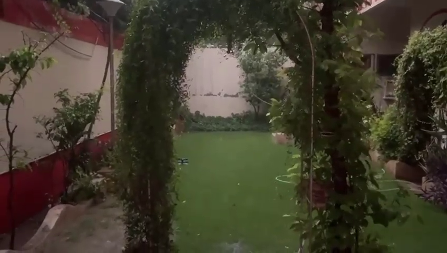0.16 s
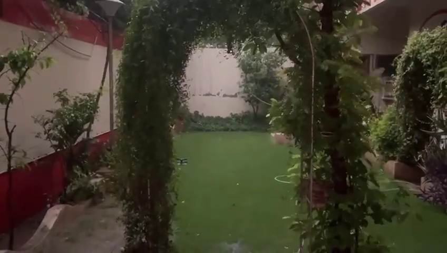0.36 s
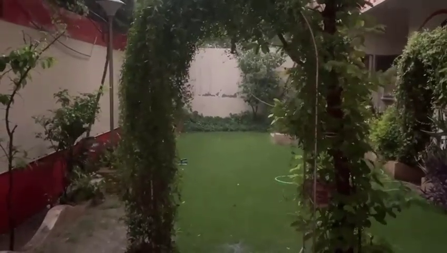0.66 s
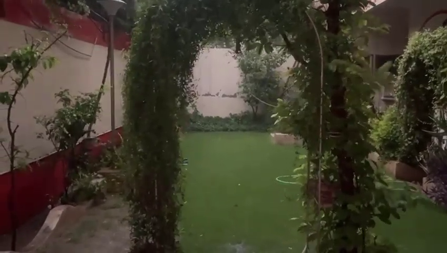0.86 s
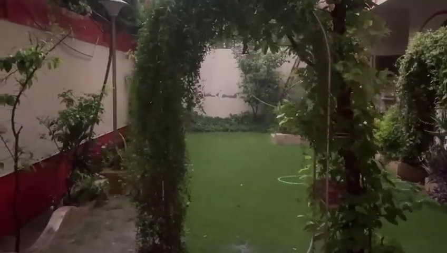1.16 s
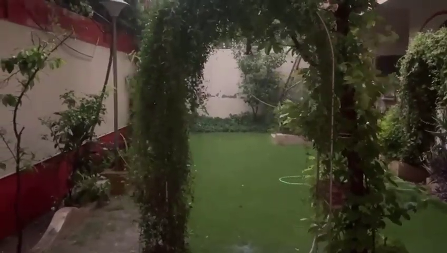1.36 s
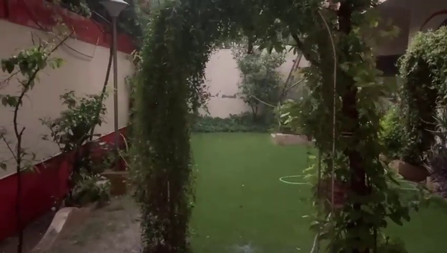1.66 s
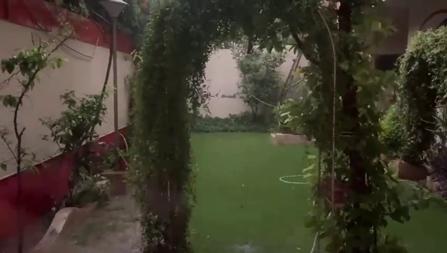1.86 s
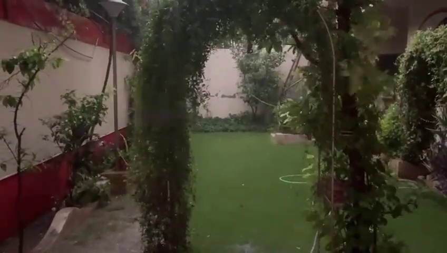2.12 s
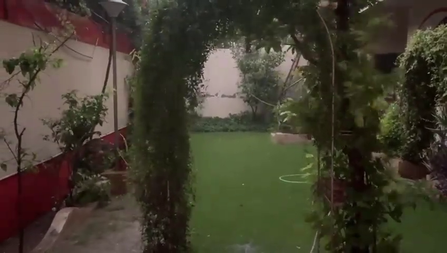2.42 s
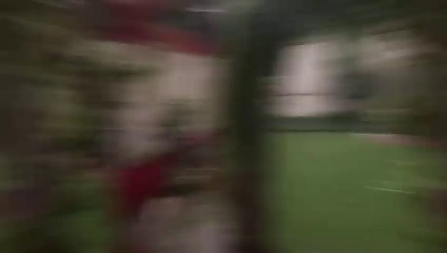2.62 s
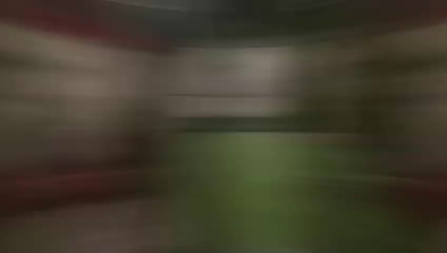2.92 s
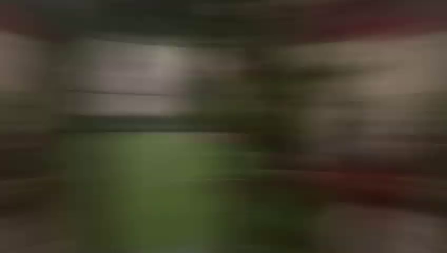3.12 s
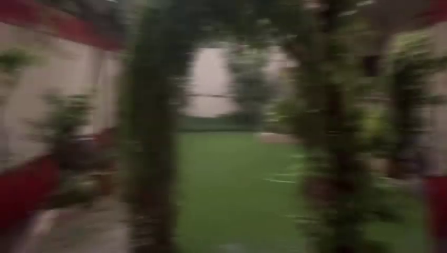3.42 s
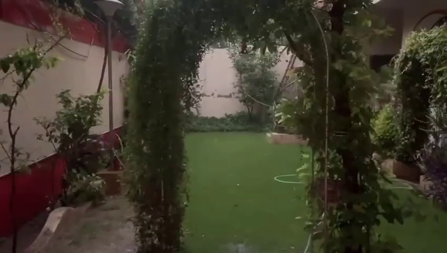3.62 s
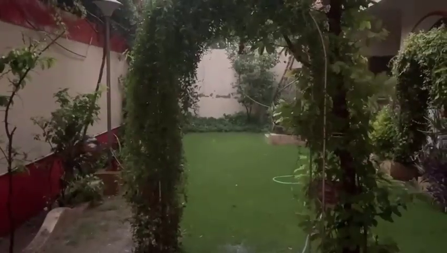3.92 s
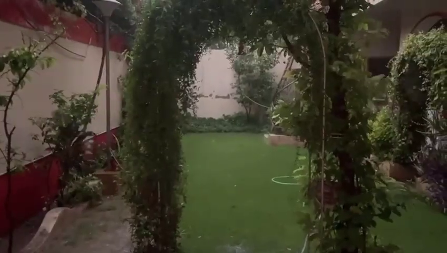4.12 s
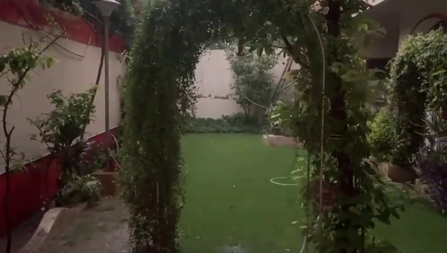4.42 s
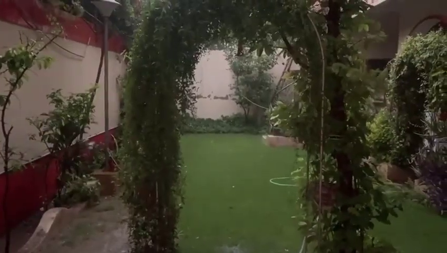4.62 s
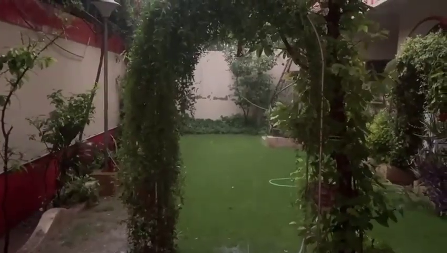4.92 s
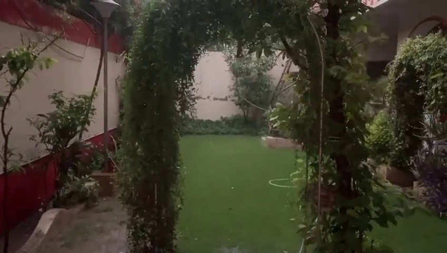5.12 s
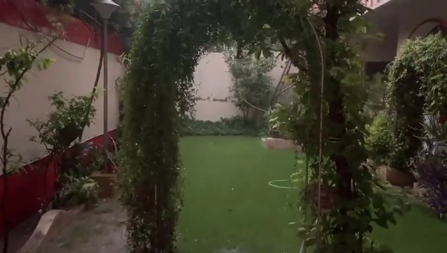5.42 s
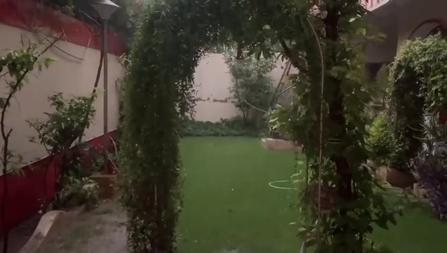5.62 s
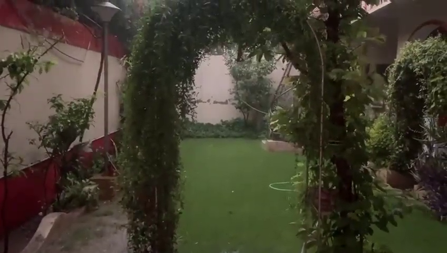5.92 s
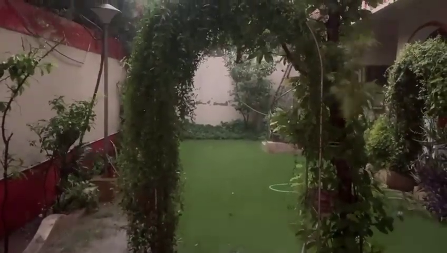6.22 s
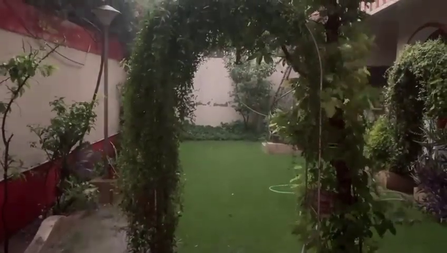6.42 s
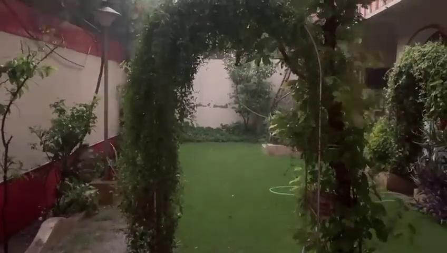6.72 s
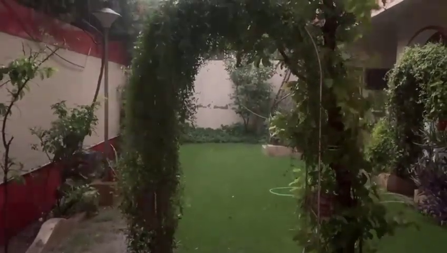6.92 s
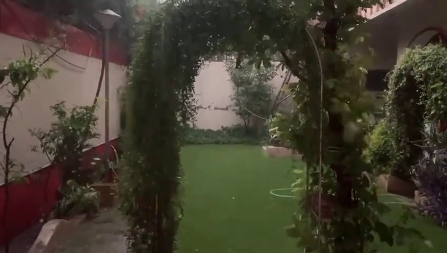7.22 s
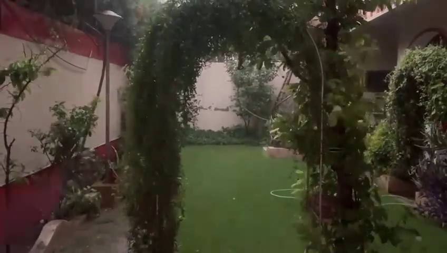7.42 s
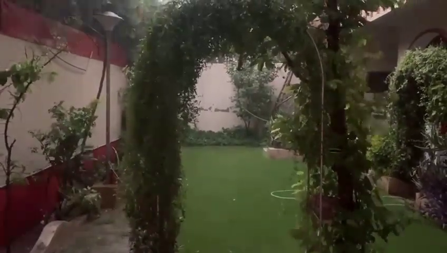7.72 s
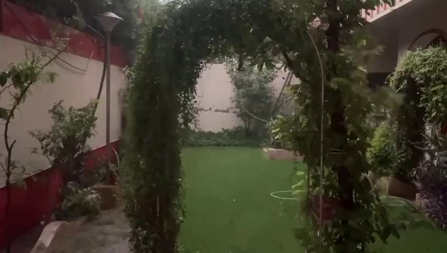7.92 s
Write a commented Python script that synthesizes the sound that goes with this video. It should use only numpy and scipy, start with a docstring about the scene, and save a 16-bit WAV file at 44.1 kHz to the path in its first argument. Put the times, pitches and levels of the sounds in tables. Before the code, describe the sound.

Dense rain patters on foliage, close drips snap and splat on stone, bass rumbles underneath, and dull handling bumps thud late on.

```python
"""Heavy garden rain

Rain on a walled garden, heard from under the eaves: a patchy noise wash thickens unevenly overall.
Close by, resonated impulses patter and tap on leaves, gliding sines plink in puddles,
and fat drips crack, splat and spray on wet paving. Swelling bass noise rumbles underneath, with air
on the microphones; sinking sine thumps are bumps of the hand-held recorder."""
import sys
import numpy as np
from scipy import signal
from scipy.fft import rfft, irfft, next_fast_len
from scipy.io import wavfile
from scipy.ndimage import uniform_filter1d

SR = 44100
rng = np.random.default_rng(int(sys.argv[2]) if len(sys.argv) > 2 else 0)


def persist_wave(psi):
    """Save psi, clipped to +-1, as 16-bit WAV."""
    counts = np.round(np.clip(psi, -1, 1) * 32767).astype(np.int16)
    wavfile.write(sys.argv[1], SR, np.atleast_2d(counts).T)


N = 355446

# Rain intensity over the garden. Each row: time in seconds, level in dB before a layer's own gain.
RAIN_LEVEL = [(0.0, -38), (2.58, -36.5), (2.9, -36.5), (3.3, -34.5), (4.08, -38), (6.13, -35), (6.28, -33),
              (8.06, -31.5)]
# Fat drips on paving. Each row: start in seconds, crack level in dB, pitch in Hz, splat level in dB,
# spray level in dB before spray_trim_db.
PAVING_DRIPS = [(0.076, -15, 3330, -21.5, -25), (0.9574, -9.5, 4900, -39, -28),
                (1.1387, -10, 2990, -27, -40), (1.2458, 6, 5670, -27, -41), (1.403, -13, 4900, -25, -27.5),
                (1.4324, -8, 4840, -26, -32.5), (1.4733, -10, 2620, -22, -25.5),
                (1.5835, -9.5, 2800, -19, -28), (1.6, -5, 5800, -25.5, -22), (1.6651, -2, 5200, -19.5, -28),
                (1.735, -14, 5400, -25.5, -39), (1.877, -19, 4660, -24, -34.5),
                (1.9249, -4, 4440, -30, -22), (1.969, -7.5, 5300, -38, -33), (2.1128, -3.5, 5540, -29, -35),
                (2.3365, -27, 2430, -30, -38), (2.3771, -6, 5130, -25, -26), (2.3966, -9.5, 4200, -26, -36),
                (3.115, -13, 3600, -29, -24.5), (3.4909, -16, 2880, -30, -31.5),
                (3.8354, -6.5, 4200, -26, -24.5), (4.35, -15, 1810, -28, -32),
                (4.3587, -15, 2350, -22, -32.5), (4.455, -14.5, 3230, -25, -26.5),
                (4.5945, -13.5, 4500, -26, -32), (4.674, -13, 3160, -16.5, -31),
                (4.6847, -15, 3930, -20, -27), (4.8009, -16, 3160, -24.5, -28.5),
                (4.8607, -12, 4670, -23, -32), (5.056, -5, 6400, -24, -44), (5.176, -11.5, 4800, -31, -42),
                (5.3647, -9, 3400, -25, -28), (5.9084, -14, 3960, -27, -26.5),
                (6.25, -10, 3900, -27, -27.5), (6.286, -11, 3280, -29, -25),
                (6.9732, -6, 5040, -30.5, -24.5), (7.2446, -14.5, 2620, -27, -26),
                (7.3716, -12, 3240, -28, -26.5), (7.6855, -5, 5170, -16.5, -20),
                (7.785, -12, 4700, -27, -24), (7.9755, -18, 4300, -26.5, -26)]
# Noise and drop spectra. Each row: frequency in Hz, relative level in dB.
WASH_SPECTRUM = [(80, -17), (200, 0.5), (400, 3.5), (700, 0.5), (1200, -0.77), (1700, -4), (2400, -5),
                 (5000, -6), (7000, -10), (9000, -13), (11400, -25)]
PATTER_SPECTRUM = [(300, -22), (1500, -10), (2100, -3), (2900, .8), (4200, 0), (5500, -.3), (7000, 0),
                   (8200, -3), (9500, -8), (11400, -13.5)]
RUMBLE_SPECTRUM = [(30, -24.5), (70, -32.5), (88, -3.5), (106, 1.5), (132, -4.5), (160, -4), (220, -9.5),
                   (330, -11.5), (500, -22), (800, -31), (1200, -56), (2500, -73.5)]
AIR_SPECTRUM = [(12, -33), (28, -12.5), (45, 4.5), (62, 9.5), (80, -0.5), (105, -16), (200, -15),
                (600, -62)]
# Likeness of left and right. Each row: frequency in Hz, likeness from 0 to 1.
STEREO_LIKENESS = [(60, .975), (300, .95), (480, .84), (700, .54), (1600, .36), (2300, .8), (3400, .52),
                   (4800, .93), (5600, .7), (6350, .35), (6650, 1), (8900, 1), (9050, .55), (9300, .4),
                   (9800, .995)]
# Phase between left and right: opposite from 6.6 to 8.9 kHz, cancelling in mono.
# Each row: frequency in Hz, lead of left over right in radians.
STEREO_LEAD = [(100, 0), (600, -.2), (1100, .4), (1800, -.3), (3200, .7), (4200, .1), (5600, 0),
               (6250, -.7), (6600, -np.pi), (8900, -np.pi), (9000, -4.2), (9400, -5.6), (9700, -2 * np.pi)]
# Balance of left and right. Each row: frequency in Hz, left minus right in dB.
STEREO_TILT = [(350, 0), (700, -1), (1500, -2), (2200, 1.5), (3400, 2.4), (4800, .8), (6000, 1.8),
               (6650, 0)]
# Recorder knocks. Each row: start in seconds, thump level in dB before the low-pass,
# settled pitch in Hz, t60 in seconds.
KNOCKS = [(2.6372, -9, 85, 0.23), (6.963, -12, 76, 0.18), (7.046, -18.5, 170, .06),
          (7.057, -12, 129, 0.075), (7.069, -8, 101, 0.072), (7.1135, -15, 69.6, 0.11),
          (7.133, -11, 90, 0.11), (7.1616, -9.5, 57.4, 0.092), (7.241, -16.5, 125, .07),
          (7.264, -11.5, 63.3, .1), (7.607, -15, 87, .22)]
# Rumble swells. Each row: crest in seconds, length (rise plus fall width) in seconds, level in dB.
RUMBLE_SWELLS = [(0.27, 0.092, -25.5), (0.434, 0.14, -24), (0.638, 0.31, -25), (2.307, 0.6, -30.5),
                 (3.41, 0.24, -25), (4.36, 0.15, -25), (4.494, 0.11, -24), (4.757, 0.19, -29.5),
                 (5.99, 0.38, -27), (6.37, 0.26, -25), (6.94, .07, -25.5), (7.154, 0.17, -20.5)]
# Stronger puffs of air. Each row: crest in seconds, length (rise plus fall width) in seconds, level in dB.
AIR_PUFFS = [(2.21, 0.57, -32.5), (3.055, 0.17, -26), (4.722, 0.24, -31), (7.162, 0.24, -27)]

PATTER_DB, PATTER_DB_PER_RAIN_DB, MIST_T60_S = -30.5, 0.071, .11
CRACK_Q, SNAP_DB = 1.8, -11  # snap relative to crack
TOCK_HZ, TOCK_DB, TOCK_DB_PER_OCTAVE, TOCK_T60_S = 2800, -8.5, -18, .03  # falls only above TOCK_HZ
BEAD_COUNT, BEAD_FIRST_S, BEAD_LAST_S, BEAD_DB = 6, .002, .02, -16  # relative to crack
SPLAT_T60_S, SPLAT_Q = .055, 2.6
SPRAY_T60_S, SPRAY_RISE_S = 0.69, 0.0031
BUBBLES_PER_S, BUBBLES_DB = 110, -42
BUBBLE_T60_AT_3KHZ_S, BUBBLE_CLIMB_PER_S = .022, 4  # climb as a share of the starting pitch
RAP_HZ, RAP_T60_S, RAP_DB = 235, .03, -13.5  # relative to thump
HEAVE_HZ, HEAVE_T60_S, HEAVE_DB = 44, .11, -8.5  # relative to thump
ROLL_REST_DB, RISE_SHARE = -28.5, 0.57  # share of a swell's length spent rising
AIR_REST_DB, AIR_DB_PER_ROLL_DB = -34.5, 0.75
RECORDER_EDGE_HZ = 11750


def wash(wash_db=6.0, patchy_db=2.0):
    """Countless far drops merge into a hiss, livelier now at one pitch, now at another."""
    grid = signal.stft(rng.standard_normal((2, N)), nperseg=512)[2]
    chance = rng.standard_normal(grid.shape[1:])
    patches = evened(signal.oaconvolve(chance, np.ones((3, 5)), "same"))
    hiss = signal.istft(grid * gain_of(patchy_db * patches), nperseg=512)[1][:, :N]
    return gain_of(wash_db) * level(RAIN_LEVEL) * coloured(hiss, WASH_SPECTRUM)


def patter(drops_per_s=3000, spread_db=3.5, biggest=4.54, spray_share=0.74, spot_q=3.9, evenness=0.33):
    """Near drops of very uneven size: each ticks at the pitch of its spot and throws a fine spray."""
    spots_hz = np.geomspace(2000, 9500, 10)
    size = drop_sizes(drops_per_s, spread_db, biggest)
    spot = rng.integers(0, len(spots_hz), N)
    sides = around(rng.random(N))  # drops land all around
    power_fade = gain_of(-60 / (MIST_T60_S * SR)) ** 2
    drops = np.zeros((2, N))
    for k, hz in enumerate(spots_hz):
        hits = size * (spot == k)
        # big drops throw most of the spray
        mist = np.sqrt(signal.lfilter([1], [1, -power_fade], hits ** 4))
        spray = (evened(mist) + evenness) * rng.standard_normal((2, N))
        ticks = np.sqrt(1 - spray_share) * evened(hits * sides)
        drops += ring(ticks + np.sqrt(spray_share) * evened(spray), hz, spot_q)
    follow = evened(level(RAIN_LEVEL)) ** PATTER_DB_PER_RAIN_DB
    return gain_of(PATTER_DB) * follow * coloured(drops, PATTER_SPECTRUM)


def drips(spray_trim_db=-1.5, droplet_db=2.0, spray_q=0.76, low_share=0.53, fizz_db=-6.0):
    """A fat drip cracks on wet stone, scatters beads, bursts in a wet splat and throws a lasting spray."""
    out, t = np.zeros((2, N)), np.arange(SR // 2) / SR
    blow = signal.lfilter(*signal.butter(4, 10000, fs=SR), signal.unit_impulse(len(t)))
    snap = signal.lfilter(*signal.butter(1, 900, "highpass", fs=SR), blow)  # toneless water on stone
    ahead = np.array([[1], [.3]])  # direct sound leans on the first signal of the pair
    for start_s, crack_db, hz, splat_db, spray_db in PAVING_DRIPS:
        band = signal.butter(2, [low_share * hz, 8000], "bandpass", fs=SR, output="sos")

        crack = peaked(ring(blow, hz, CRACK_Q)) + gain_of(SNAP_DB) * snap / snap.max()
        octaves_up = max(np.log2(hz / TOCK_HZ), 0)
        tock_db = TOCK_DB + TOCK_DB_PER_OCTAVE * octaves_up
        tock = decay(t, TOCK_T60_S, tock_db) * np.sin(2 * np.pi * hz * t)
        add(out, start_s, gain_of(crack_db) * (peaked(crack) + tock) * ahead)

        for late, turn, small in rng.random((BEAD_COUNT, 3)):
            bead = gain_of(crack_db + BEAD_DB) * peaked(ring(blow, hz * 2 ** (small - .5), CRACK_Q))
            delay_s = BEAD_FIRST_S + (BEAD_LAST_S - BEAD_FIRST_S) * late
            add(out, start_s + delay_s, np.outer(around(turn), bead))

        droplet_size = gain_of(droplet_db * np.minimum(rng.exponential(1, len(t)), 5))
        droplets = rng.standard_normal((4, len(t))) * droplet_size
        fizz = gain_of(fizz_db) * evened(signal.sosfilt(band, droplets[:2]))
        burst = evened(ring(ring(droplets[:2], hz, SPLAT_Q), hz, SPLAT_Q))
        add(out, start_s, evened(burst + fizz) * decay(t, SPLAT_T60_S, splat_db))

        spray = evened(signal.sosfilt(band, ring(droplets[2:], hz, spray_q)))
        rise = 1 - np.exp(-t / SPRAY_RISE_S)
        add(out, start_s, spray * rise * decay(t, SPRAY_T60_S, spray_db + spray_trim_db))
    return out


def leaves(leaves_db=-40.5, taps_per_s=300, spread_db=7.5, biggest=1.5,
           lowest_tap_t60_s=0.0029, smack_t60_s=0.04, smack_db=-21.0):
    """Middling drops tap the nearest leaves: each leaf ticks at its own pitch, with a short wet smack."""
    out, t = np.zeros((2, N)), np.arange(SR // 20) / SR
    pitches_hz = np.geomspace(2400, 6800, 24)
    for hz in pitches_hz:
        size = drop_sizes(taps_per_s / len(pitches_hz), spread_db, biggest)
        tap_t60_s = lowest_tap_t60_s * pitches_hz[0] / hz
        tick = np.sin(2 * np.pi * hz * t) * decay(t, tap_t60_s)
        smack = evened(ring(rng.standard_normal(len(t)), hz, 1.5)) * decay(t, smack_t60_s, smack_db)
        taps = signal.oaconvolve(size, tick + smack)[:N]
        out += np.outer(around(rng.random()), taps)
    return gain_of(leaves_db) * evened(out)


def puddles():
    """Drops trap tiny bubbles in standing water: each plinks, rising in pitch; higher ones are shorter."""
    out, t = np.zeros((2, N)), np.arange(SR // 20) / SR
    for when, small, far, turn in rng.random((round(BUBBLES_PER_S * N / SR), 4)):
        hz, size_db = 2200 * 3 ** small, -14 * far
        cycles = hz * t * (1 + BUBBLE_CLIMB_PER_S * t / 2)
        plink = np.sin(2 * np.pi * cycles) * decay(t, BUBBLE_T60_AT_3KHZ_S * 3000 / hz, size_db)
        add(out, when * N / SR, np.outer(around(turn), plink))
    return gain_of(BUBBLES_DB) * evened(out)


def bump(overshoot=2.04, settle_s=0.0033, soft_hz=350):
    """The hand-held recorder is knocked: its casing raps, a thump sinks in pitch, the whole body heaves."""
    out, t = np.zeros((2, N)), np.arange(SR // 3) / SR
    rap = decay(t, RAP_T60_S, RAP_DB) * np.sin(2 * np.pi * RAP_HZ * t)
    heave = decay(t, HEAVE_T60_S, HEAVE_DB) * np.sin(2 * np.pi * HEAVE_HZ * t)
    for start_s, thump_db, hz, t60_s in KNOCKS:
        cycles = np.cumsum(hz * (1 + overshoot * np.exp(-t / settle_s))) / SR
        thump = decay(t, t60_s) * np.sin(2 * np.pi * cycles)
        add(out, start_s, gain_of(thump_db) * (heave - thump - rap))
    return signal.sosfilt(signal.butter(4, soft_hz, fs=SR, output="sos"), out)


def rumble(steadiness=0.064):
    """Deep noise rolls like far thunder; softer pushes of air on the microphones swell with it."""
    roll = swelling(ROLL_REST_DB, RUMBLE_SWELLS)
    breeze = gain_of(AIR_REST_DB) * (roll / gain_of(ROLL_REST_DB)) ** AIR_DB_PER_ROLL_DB
    air = np.hypot(swelling(-np.inf, AIR_PUFFS), breeze)
    return roll * low_noise(RUMBLE_SPECTRUM, steadiness) + air * low_noise(AIR_SPECTRUM, steadiness)


def low_noise(spectrum, steadiness):
    """Bass noise with its chance swells partly evened out."""
    noise = coloured(rng.standard_normal((2, N)), spectrum)
    power = abs(uniform_filter1d(noise ** 2, size=3500)) + 1e-6
    return evened(noise / power ** (steadiness / 2))


def swelling(rest_db, events):
    """Gain per sample: a resting power plus a lopsided bell of power for each event."""
    t, power = np.arange(N) / SR, gain_of(rest_db) ** 2
    for crest_s, length_s, db in events:
        width_s = length_s * np.where(t < crest_s, RISE_SHARE, 1 - RISE_SHARE)
        power = power + gain_of(db) ** 2 * np.exp(-((t - crest_s) / width_s) ** 2)
    return np.sqrt(power)


def drop_sizes(drops_per_s, spread_db, biggest):
    """Chance impulses with exponential sizes in dB, capped at biggest times spread_db."""
    size = gain_of(spread_db * np.minimum(rng.exponential(1, N), biggest))
    return size * (rng.random(N) < drops_per_s / SR)


def around(turn):
    """Weights on the two signals of a pair for a direction in turns."""
    return np.array([np.cos(2 * np.pi * turn), np.sin(2 * np.pi * turn)])


def decay(t, t60_s, start_db=0):
    """Exponential decay gain, falling 60 dB in t60_s."""
    return gain_of(start_db - 60 * t / t60_s)


def ring(x, hz, q):
    """A broad resonance, hz / q wide."""
    return signal.lfilter(*signal.iirpeak(hz, q, fs=SR), x)


def coloured(x, spectrum):
    """Filter x by a spectrum and scale to rms 1."""
    size = next_fast_len(N)
    gain = gain_of(read(spectrum, np.fft.rfftfreq(size, 1 / SR)))
    return evened(irfft(rfft(x, size) * gain, size)[..., :N])


def read(points, hz):
    """Interpolate a table over log frequency."""
    table_hz, value = np.transpose(points)
    return np.interp(np.log(hz + 1), np.log(table_hz + 1), value)


def level(curve):
    """A dB curve as a gain for every sample."""
    return gain_of(np.interp(np.arange(N) / SR, *np.transpose(curve)))


def gain_of(db):
    """Decibels to amplitude."""
    return 10 ** (np.asarray(db) / 20)


def evened(x):
    """Scale to rms 1."""
    return x / np.sqrt(np.mean(x ** 2) + 1e-20)


def peaked(x):
    """Scale to peak 1."""
    return x / abs(x).max()


def add(mix, start_s, sound):
    """Mix a sound in, cut off at the end of the mix."""
    part = mix[:, round(start_s * SR):][:, :sound.shape[-1]]
    part += sound[..., :part.shape[-1]]


def left_and_right(pair):
    """Turn a signal pair into left and right: partly alike, with phase and balance set by frequency."""
    size = next_fast_len(N)
    hz = np.fft.rfftfreq(size, 1 / SR)
    a, b = rfft(pair, size)
    same = read(STEREO_LIKENESS, hz)
    shared, apart = np.sqrt((1 + same) / 2) * a, np.sqrt((1 - same) / 2) * b
    # half the tilt and lead goes to each side
    lean = gain_of(read(STEREO_TILT, hz) / 2) * np.exp(.5j * read(STEREO_LEAD, hz))
    return irfft(np.array([(shared + apart) * lean, (shared - apart) / lean]), size)[:, :N]


def scene():
    """Rain far and near over the rumble, plus knocks that are equal in left and right."""
    airborne = wash() + patter() + drips() + leaves() + puddles() + rumble()
    return left_and_right(airborne) + bump()


def record(dry):
    """The recorder's full scale and upper band limit."""
    band = signal.firwin(401, RECORDER_EDGE_HZ, window=("kaiser", 8), fs=SR)
    return signal.oaconvolve(np.clip(dry, -1, 1), band[None], "same", axes=1)


dry = scene()
out = record(dry)
persist_wave(out)
```